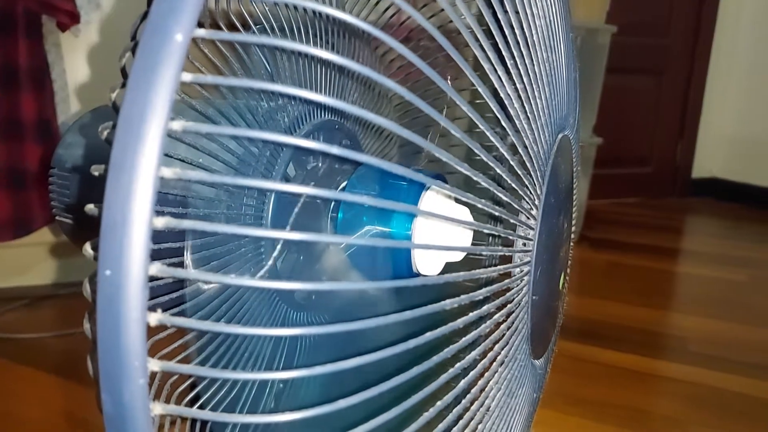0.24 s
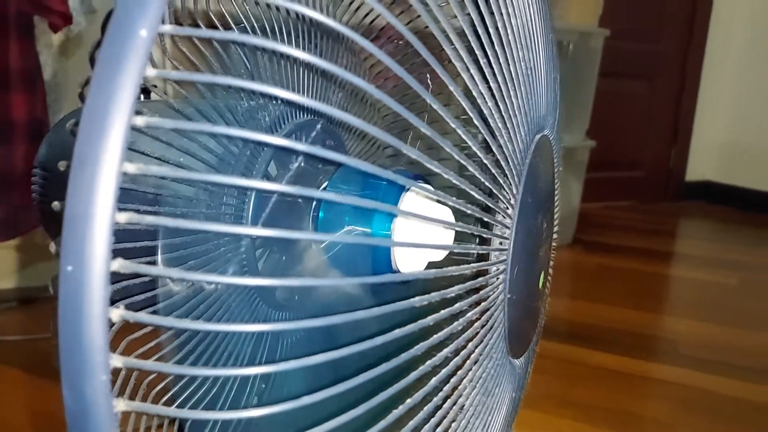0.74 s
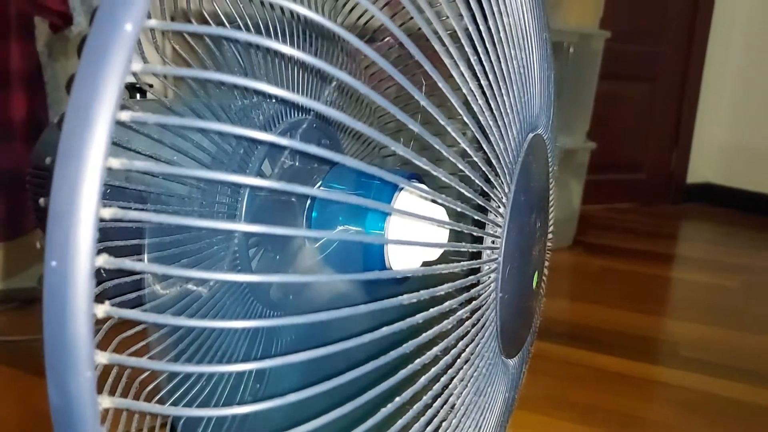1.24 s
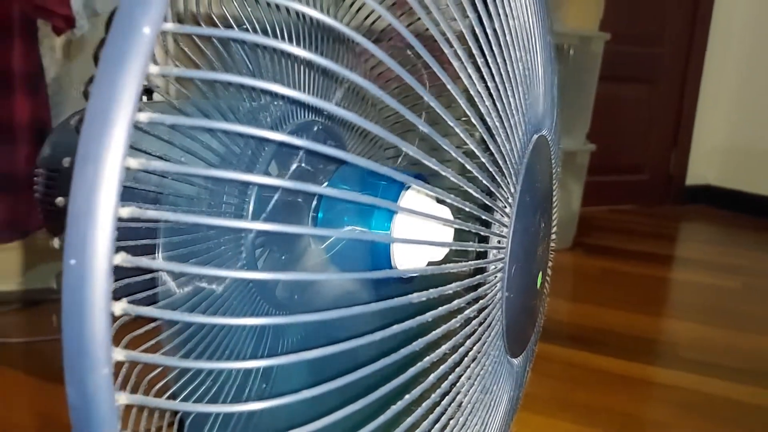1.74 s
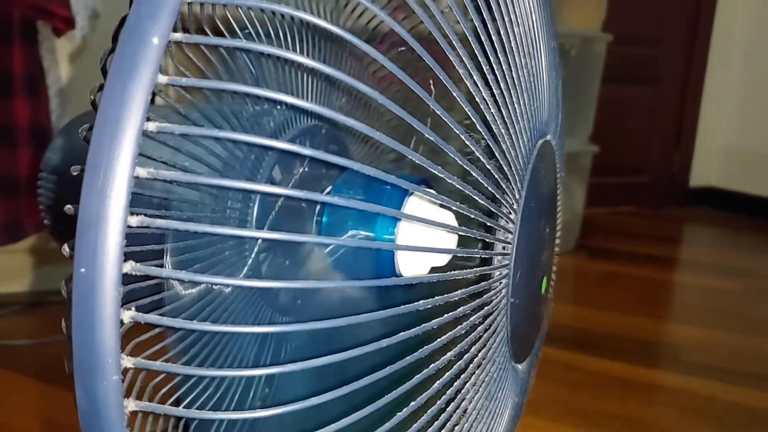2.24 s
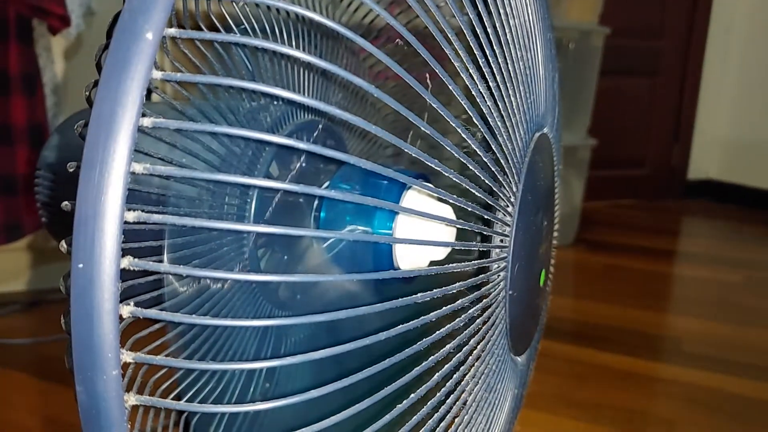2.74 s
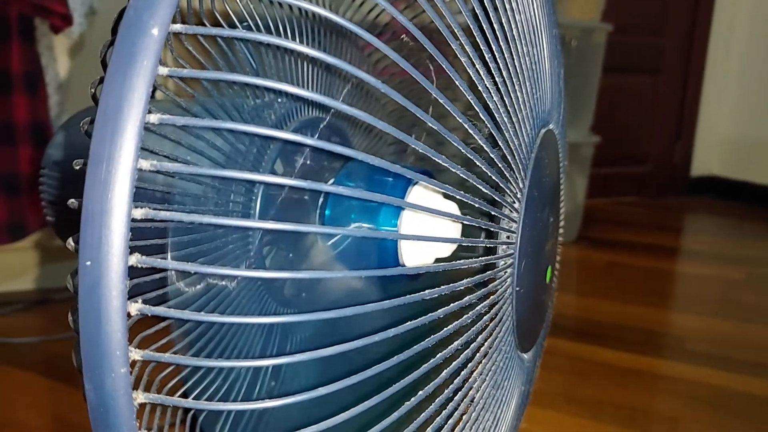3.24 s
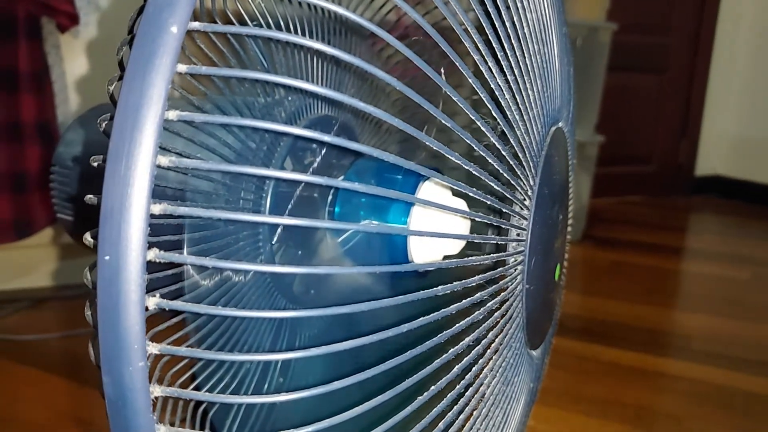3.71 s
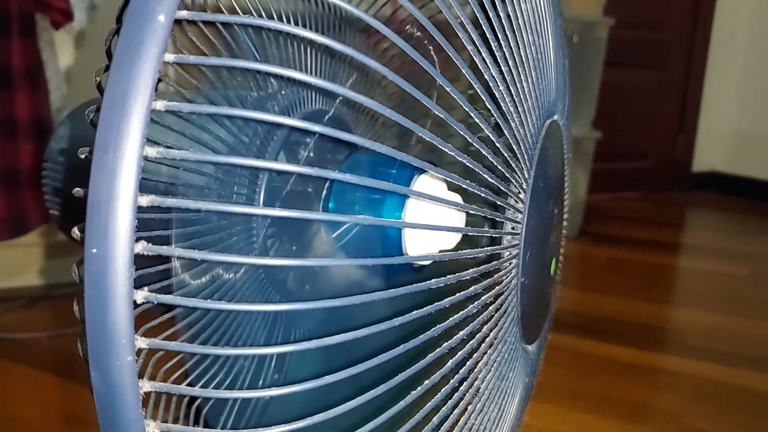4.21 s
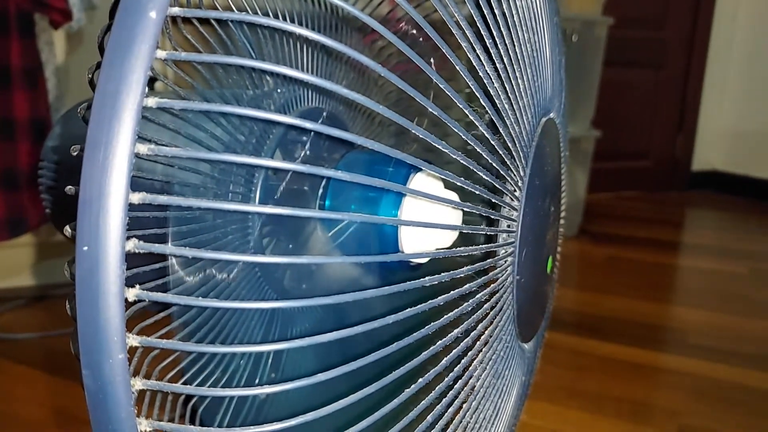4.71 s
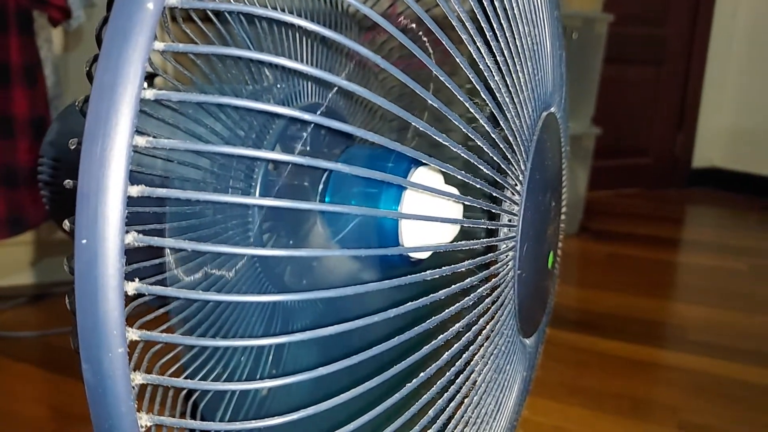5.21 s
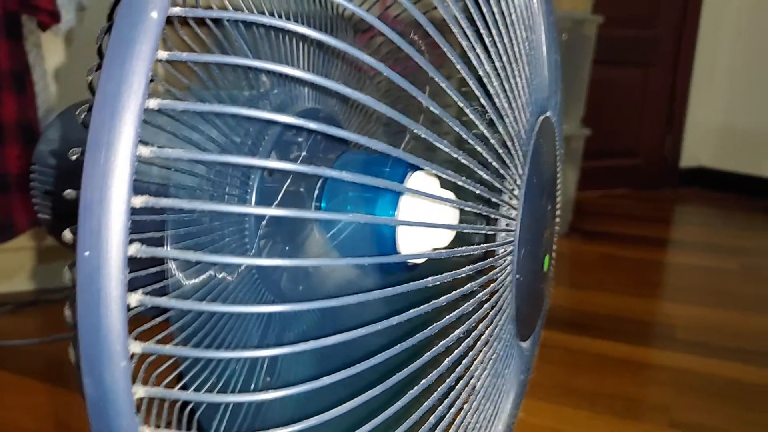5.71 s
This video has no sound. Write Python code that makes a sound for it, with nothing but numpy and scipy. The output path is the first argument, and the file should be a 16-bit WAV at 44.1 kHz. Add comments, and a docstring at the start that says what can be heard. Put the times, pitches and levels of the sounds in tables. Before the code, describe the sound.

Close, constant whirr of an electric fan: deep hum, breathy airflow with gentle puffs, and a slight increase in openness after three seconds.

```python
"""A three-blade desk fan runs steadily, close to the microphone in a small room: blade-rate tones throb,
the motor hums at twice the mains rate and whines faintly at its rotor slots, filtered noise makes the rush,
hiss and rumble of air, and the unbalanced rotor brushes once a turn. The hiss swells at its top near 0.9 s,
two faint ticks fall near 2.5 s, and just past halfway the fan comes to face the microphone more openly,
fuller and brighter. Puffs and slight dips of the hum come before and after that."""
import sys
import numpy as np
from scipy import signal
from scipy.fft import rfft, irfft, next_fast_len
from scipy.io import wavfile

SR = 44100
rng = np.random.default_rng(int(sys.argv[2]) if len(sys.argv) > 2 else 0)


def inscribe(sig):
    """Save sig as 16-bit PCM at rate SR to the path in sys.argv[1].

    A 1-D sig is mono; a 2-D sig holds one channel per row.
    Samples are clipped to [-1, 1] before scaling.
    """
    pcm = np.round(np.clip(np.atleast_2d(sig).T, -1, 1) * 32767)
    wavfile.write(sys.argv[1], SR, pcm.astype(np.int16))


N = 262836
TIME = np.arange(N) / SR  # s
SHAFT_HZ, HUM_HZ, BLADES, SLOTS = 16.614, 99.96, 3, 25


def gain_of(db):
    """Decibels to amplitude."""
    return 10 ** (np.asarray(db) / 20)


def evened(x):
    """Scales to rms 1."""
    return x / np.sqrt(np.mean(abs(x) ** 2) + 1e-30)


def read(points, hz):
    """Interpolates (Hz, value) points on a log-frequency axis."""
    point_hz, value = np.transpose(points)
    return np.interp(np.log(hz + 1), np.log(abs(point_hz) + 1), value)


def bump(centre_s, width_s):
    """Gaussian rise and fall of height 1; width is the 1/e half-width."""
    return np.exp(-((TIME - centre_s) / width_s) ** 2)


def drift(rate_hz):
    """Slow random curve of rms 1: low-passed noise made at 256 Hz."""
    size, slow_sr = 2048, 256
    hz = np.fft.rfftfreq(size, 1 / slow_sr)
    slow = irfft(rfft(rng.standard_normal(size)) / (1 + (hz / rate_hz) ** 2))
    return evened(np.interp(TIME, np.arange(size) / slow_sr, slow))


def coloured(x, points):
    """Filters by a spectrum in dB."""
    size = next_fast_len(N)
    gain = gain_of(read(points, np.fft.rfftfreq(size, 1 / SR)))
    return irfft(rfft(x, size) * gain, size)[..., :N]


def air(points):
    """Stereo noise, alike in the bass and unrelated in the treble; the channel mean has rms 1."""
    # left-right likeness: hz, likeness (0-1)
    likeness = [(30, 0.75), (130, 0.86), (290, 0.71), (640, 0.77), (1000, 0.65), (1410, 0.34), (2200, 0),
                (3100, 0), (15000, 0)]
    # left-right level difference: hz, left_over_right_db
    balance = [(60, 2.5), (200, 0), (380, -1), (700, 1), (1290, -3.5), (2380, -0.5), (4400, -2.5),
               (8120, 0), (15000, 0)]
    size = next_fast_len(N)
    hz = np.fft.rfftfreq(size, 1 / SR)
    a, b = rng.standard_normal((2, len(hz))) + 1j * rng.standard_normal((2, len(hz)))
    same = np.clip(read(likeness, hz), -1, 1)
    lean = gain_of(read(balance, hz) / 2)
    left = a * lean
    right = (same * a + np.sqrt(1 - same ** 2) * b) / lean
    pair = irfft(np.array([left, right]) * gain_of(read(points, hz)), size)[:, :N]
    return pair / pair.mean(0).std()


def tone(turns, left_db, right_db, waver, waver_hz):
    """A line whose strength and phase waver in the uneven airflow."""
    angle = (2 * np.pi * (turns % 1)).astype(np.float32)
    in_phase = (1 + waver * drift(waver_hz)) * np.cos(angle)
    quadrature = waver * drift(waver_hz) * np.sin(angle)
    return gain_of([[left_db], [right_db]]) * evened(in_phase + quadrature)


def exposed(shift_at_s=3.385, shift_takes_s=.11, creep_per_s=.03):
    """How openly the fan faces the microphone, 0-1: a slow creep and one quick shift."""
    shift = np.clip((TIME - shift_at_s) / shift_takes_s + .5, 0, 1)
    return creep_per_s * TIME + (1 - creep_per_s * TIME[-1]) * shift


def blades(shaft, exposure, opening_db=5, fade_db_per_s=.5):
    """Each passing blade pushes a pulse of air, heard as harmonics of the blade rate."""
    # blade-passing tones before the swell: harmonic, left_db, right_db, waver (0-1)
    blade_tones = [(1, -42, -52.5, 0), (3, -57.5, -68.5, .6), (5, -69.5, -62, .7)]
    swell_db = opening_db * exposure - fade_db_per_s * TIME
    tones = sum(tone(round(k) * BLADES * shaft, left_db, right_db, waver, waver_hz=5)
                for k, left_db, right_db, waver in blade_tones)
    return gain_of(swell_db) * tones


def hum(exposure, opening_db=1.75, growth_db_per_s=.26):
    """The pulsing magnetic field shakes the stator; the level dips briefly."""
    # magnetic hum before the swell: harmonic, left_db, right_db, waver (0-1)
    hum_tones = [(1, -42.5, -39.5, 0.04), (2, -63, -65.5, 0.21), (3, -80.5, -75, .4),
                 (4, -78.5, -85.5, 0.6)]
    # brief dips: centre_s, width_s, change_db
    hum_dips = [(2.2, 0.13, -0.8), (4.38, 0.36, -1.1)]
    dips_db = sum(db * bump(s, width_s) for s, width_s, db in hum_dips)
    swell_db = opening_db * exposure + growth_db_per_s * TIME + dips_db
    tones = sum(tone(round(k) * HUM_HZ * TIME, left_db, right_db, waver, waver_hz=5.7)
                for k, left_db, right_db, waver in hum_tones)
    return gain_of(swell_db) * tones


def whine(shaft):
    """Rotor-slot tones with sidebands that the pulsing field puts on them."""
    # place of each line: slot_rate_multiple, sideband (steps of HUM_HZ)
    slot_lines = [(1, -1), (1, 0), (1, 1), (1, 2), (1, 3), (2, -1), (2, 0), (3, 0), (3, 1), (3, 3), (5, 0)]
    # level of each line: left_db, right_db
    slot_tones = [(-78, -76.5), (-71.5, -71.5), (-61, -65), (-63.5, -65.5), (-71.5, -74), (-68, -74.5),
                  (-74.5, -75.5), (-83.5, -80), (-84.5, -80.5), (-88, -78.5), (-92, -85.5)]
    return sum(tone(k * SLOTS * shaft + side * HUM_HZ * TIME, left_db, right_db, waver=.52, waver_hz=3.6)
               for (k, side), (left_db, right_db) in zip(slot_lines, slot_tones))


def caged(x):
    """Adds the narrow peaks and notches of the cage and the floor reflection."""
    # peaks and notches: centre_hz, width_hz, peak_db
    colour = [(328, 25, -3), (559, 83, 4.5), (750, 96, -2.5), (840, 100, 2), (1092, 150, -2.5),
              (1235, 130, 1), (1397, 84, -8.5), (1636, 170, 3.5), (1805, 88, -4.5), (2165, 170, -5)]
    hz = np.arange(0, 3000, 10)
    db = sum(peak_db * np.exp(-(2 * (hz - centre_hz) / width_hz) ** 2)
             for centre_hz, width_hz, peak_db in colour)
    return coloured(x, np.transpose([hz, db]))


def rush(exposure, base_db=-53.5, gust_db=.68, buzz_db=.3, turn_db=1.0):
    """Turbulence through the cage: it gusts, buzzes slightly with the motor, and brightens with exposure."""
    # turbulence at the blades, before the cage: hz, density_db (per Hz)
    rush_spectrum = [(150, -31.5), (290, -5.5), (400, -6), (560, -4), (750, -3.5), (1000, -6.5),
                     (1300, -11), (1700, -14.5), (2050, -18.5), (2400, -27), (3200, -50.5), (5000, -100)]
    # what full exposure adds, before the left-right turn: hz, gain_db
    opening = [(260, 1.5), (400, 1.6), (550, 1), (750, 2.5), (1000, 2.5), (1350, 3.5), (1500, 3.5),
               (1720, 6.5), (1900, 3.5), (2400, -1)]
    shaded = caged(air(rush_spectrum))
    facing = coloured(shaded, opening) * gain_of([[-turn_db], [turn_db]])
    buzz = np.cos(2 * np.pi * HUM_HZ * TIME)
    level_db = base_db + gust_db * drift(rate_hz=6) + buzz_db * buzz
    return gain_of(level_db) * (shaded + exposure * (facing - shaded))


def rumble(base_db=-54.5, gust_db=1.24):
    """Low eddies in the draught, with a few stronger puffs."""
    # low eddies: hz, density_db (per Hz)
    rumble_spectrum = [(10, -8), (30, -2), (60, 1), (90, -1), (138, 2), (180, -6), (243, -3.5),
                       (280, -11.5), (340, -21.5), (900, -91)]
    # puffs: centre_s, width_s, rise_db
    puffs = [(.9, 0.14, 3.5), (2.83, 0.06, 6.5), (4.52, 0.15, 3.5)]
    puffs_db = sum(db * bump(s, width_s) for s, width_s, db in puffs)
    return gain_of(base_db + gust_db * drift(rate_hz=4.0) + puffs_db) * air(rumble_spectrum)


def eddies(start_db=-75.5, growth_db_per_s=2.5):
    """Eddies shed around the fifth blade harmonic grow slowly."""
    # shed eddies: hz, density_db (per Hz)
    eddy_spectrum = [(150, -48), (225, -10), (250, 2.5), (290, -5), (320, -9.5), (420, -40.5), (900, -100)]
    return gain_of(start_db + growth_db_per_s * TIME) * air(eddy_spectrum)


def hiss(exposure, base_db=-72.5, opening_db=.5):
    """Fine turbulence above the rush, slightly louder with exposure."""
    # fine hiss: hz, density_db (per Hz)
    hiss_spectrum = [(1300, -26), (2200, -1), (2500, -2.5), (3300, -5.5), (3800, -9), (4900, -10.5),
                     (6400, -16), (7200, -15.5), (8500, -19), (9900, -20.5), (10300, -22.5), (11200, -20.5),
                     (13700, -19.5), (15600, -20.5)]
    return gain_of(base_db + opening_db * exposure) * air(hiss_spectrum)


def brush(shaft, at_turn=.41, sharpness=3, rebound=.4, uneven_db=1.1):
    """The wobbling rotor brushes softly once a turn, and more weakly half a turn later."""
    # brushing noise: hz, density_db (per Hz)
    brush_spectrum = [(2000, -9), (3500, -13), (5000, 1.5), (7500, 2), (9000, -9), (12000, -21)]
    swing = np.cos(2 * np.pi * (shaft - at_turn))
    contact = np.exp(sharpness * (swing - 1)) + rebound * np.exp(-sharpness * (swing + 1))
    uneven = gain_of(uneven_db * drift(rate_hz=6))
    side_gain = gain_of([[-77], [-80]]) / np.sqrt(2)  # left, right
    return side_gain * air(brush_spectrum) * contact * uneven


def fizz(centre_s=.9, width_s=.115, peak_db=-78.0):
    """The top of the hiss swells briefly."""
    # top of the hiss: hz, density_db (per Hz)
    fizz_spectrum = [(3000, -40), (5000, -12), (7000, -4), (10000, 0), (14000, 2), (15600, 0)]
    return gain_of(peak_db) * air(fizz_spectrum) * bump(centre_s, width_s)


def ticks(decay_s=.0009):
    """Tiny ticks, each a few cycles of one decaying pitch."""
    # faint ticks: start_s, pitch_hz, left_db, right_db
    tick_list = [(2.506, 5100, -57, -62), (2.585, 8700, -65, -73)]
    out = np.zeros((2, N))
    for start_s, pitch_hz, left_db, right_db in tick_list:
        t = np.maximum(TIME - start_s, 0)
        ring = np.sin(2 * np.pi * pitch_hz * t) * np.exp(-t / decay_s)
        out += gain_of([[left_db], [right_db]]) * ring
    return out


def scene():
    """One shaft, almost constant in speed, times blades, whine and brush; exposure lifts other layers too."""
    shaft = np.cumsum(SHAFT_HZ * (1 + .0003 * drift(rate_hz=.7))) / SR  # turns
    exposure = exposed()
    tonal = blades(shaft, exposure) + hum(exposure) + whine(shaft)
    draught = rush(exposure) + rumble() + eddies() + hiss(exposure)
    return tonal + draught + brush(shaft) + fizz() + ticks()


def record(dry, edge_hz=15700):
    """The recorder's band limit: a linear-phase low-pass."""
    lowpass = signal.firwin(511, edge_hz, window=("kaiser", 9), fs=SR)
    return signal.oaconvolve(dry, lowpass[None], "same")


dry = scene()
out = record(dry)
inscribe(out)
```